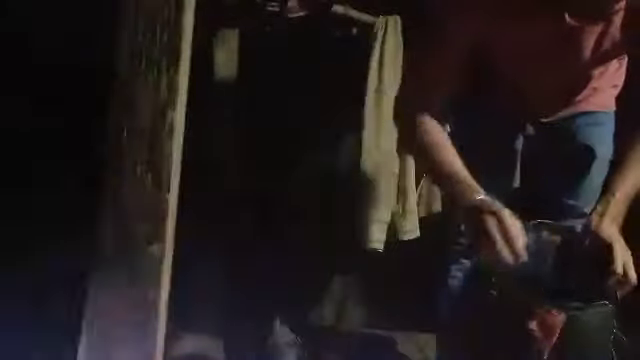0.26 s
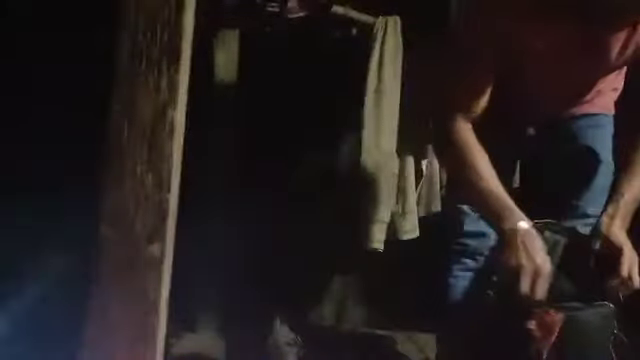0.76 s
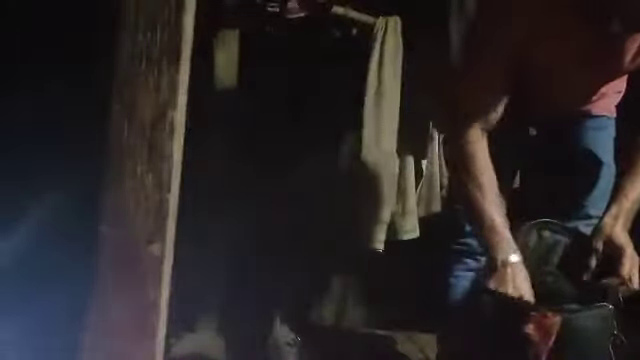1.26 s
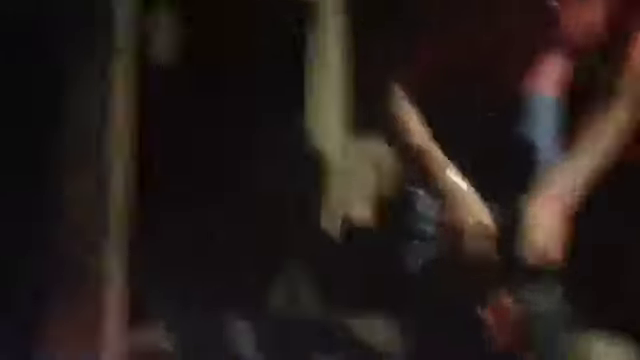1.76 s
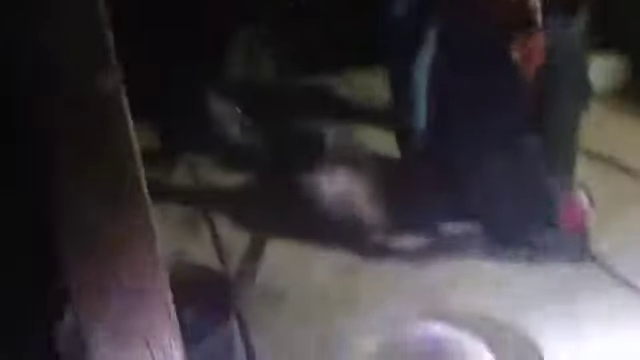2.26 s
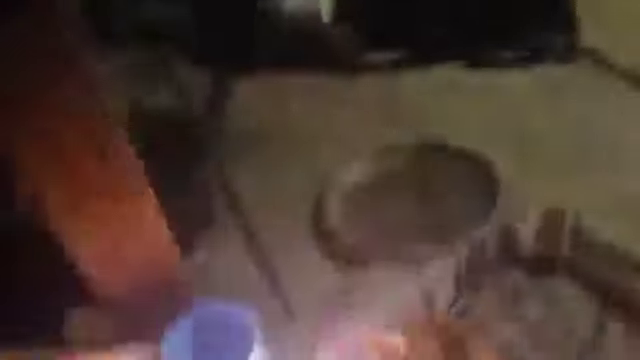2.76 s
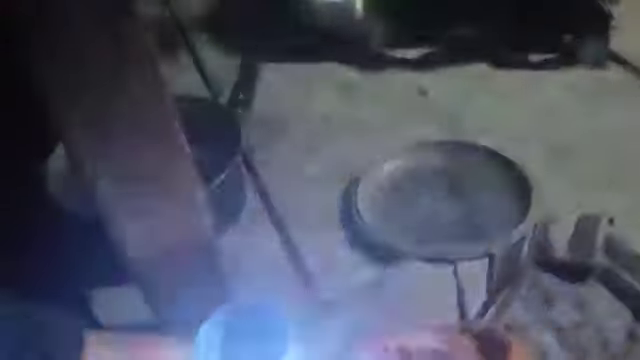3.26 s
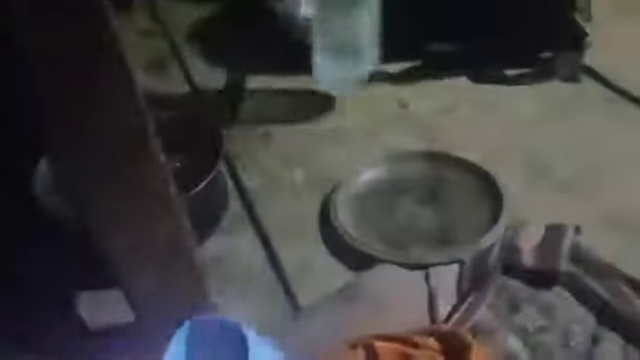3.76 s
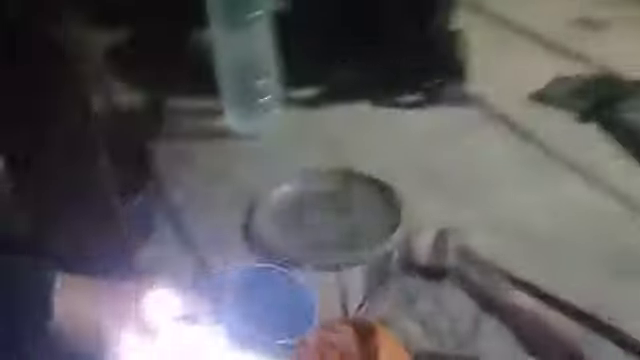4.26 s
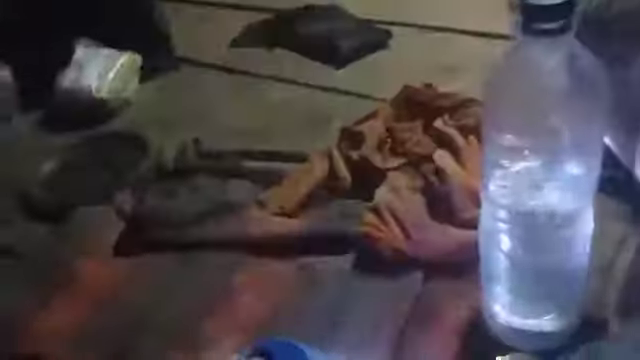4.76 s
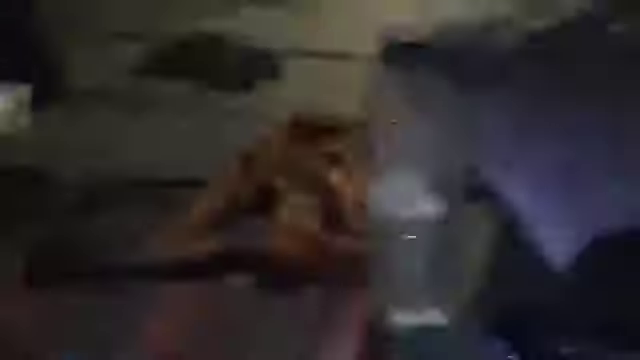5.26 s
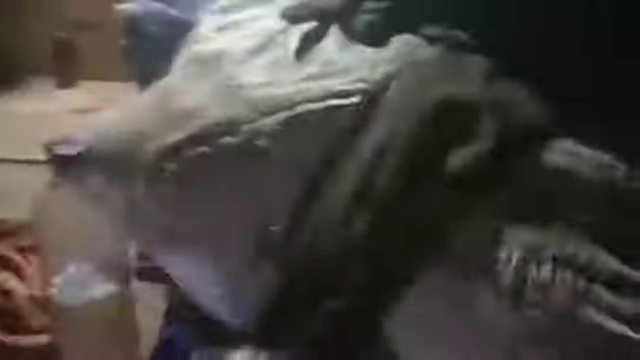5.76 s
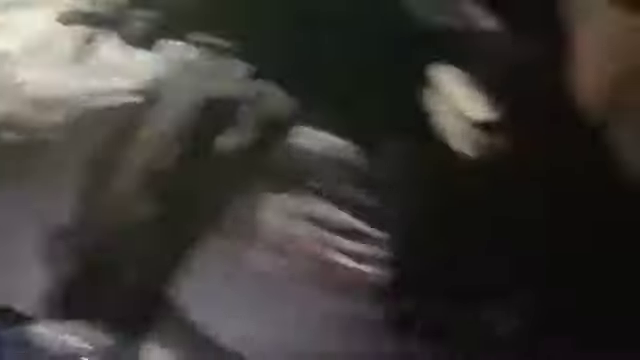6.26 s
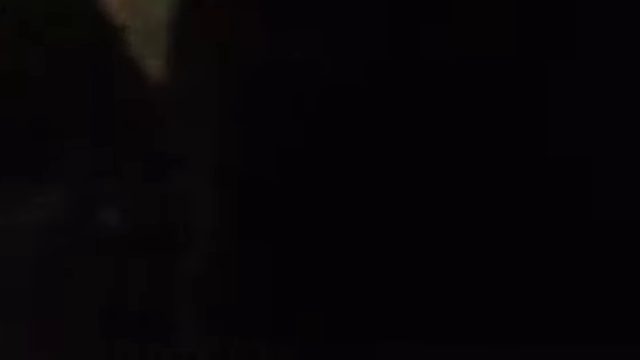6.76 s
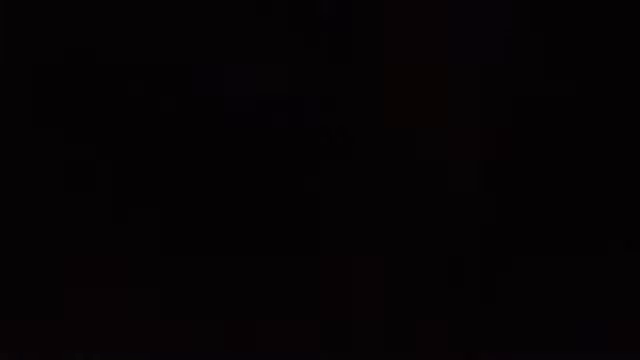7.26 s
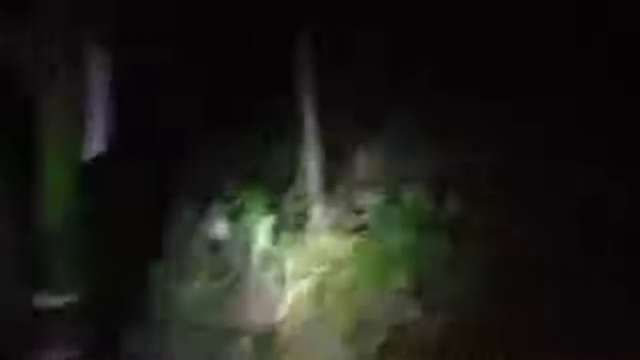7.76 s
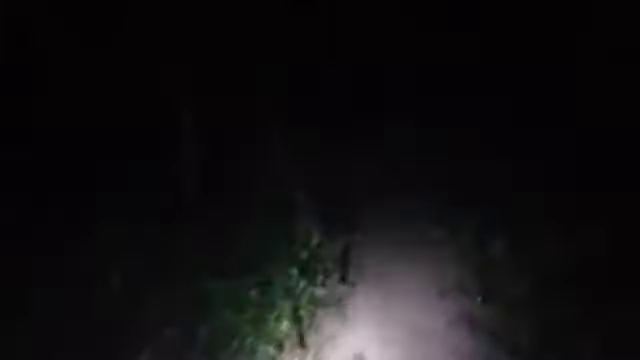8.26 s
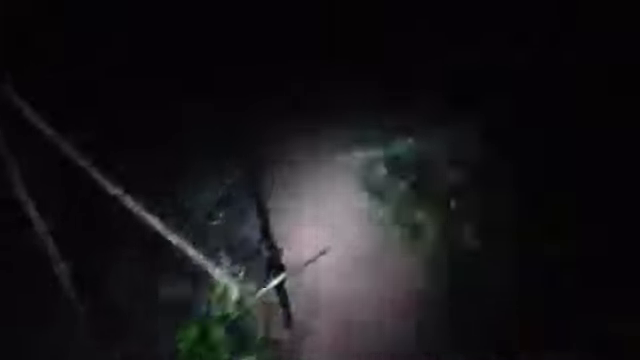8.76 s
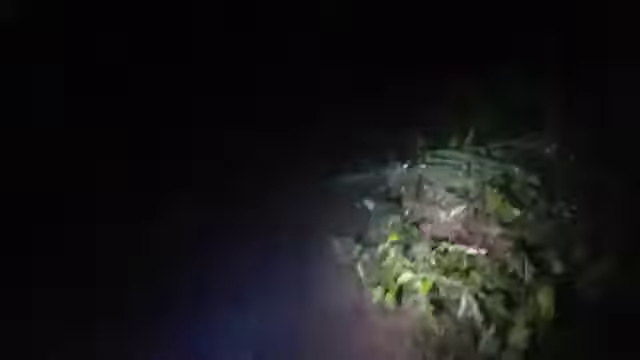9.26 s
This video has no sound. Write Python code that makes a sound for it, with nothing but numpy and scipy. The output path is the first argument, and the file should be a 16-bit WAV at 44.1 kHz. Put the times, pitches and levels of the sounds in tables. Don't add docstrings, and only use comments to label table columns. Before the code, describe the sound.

Close handling bumps and dry clicks over a dense night insect chorus, one metallic pan clank, then a fade to fainter, faster chirping with more knocks.

```python
import sys
import numpy as np
from scipy import signal
from scipy.fft import rfft, irfft, next_fast_len
from scipy.io import wavfile
from scipy.ndimage import uniform_filter1d

SR = 44100
rng = np.random.default_rng(int(sys.argv[2]) if len(sys.argv) > 2 else 0)


def wrap_up_sound(samples):
    columns = np.atleast_2d(samples).T
    tamed = np.clip(columns, -1, 1)
    steps = np.round(tamed * 32767).astype(np.int16)
    wavfile.write(sys.argv[1], SR, steps)


def voltage_ratio(decibels):
    exponent = np.asarray(decibels, float) / 20
    return 10 ** exponent


N = 418509
TIME = np.arange(N) / SR
FADE_S = (4.495, 4.824)
SECOND_SHOT_S = 4.72
FASTER = 1.195

# one singer's pitch in Hz, level in dB.
HUT_SINGERS = [(1965, -63), (2004, -65.5), (2027, -68.5), (2058, -67), (2132, -63.5), (2161, -59.5),
               (2176, -64), (2204, -64.5), (2260, -64.5), (2326, -64), (2342, -64), (2358, -65.5),
               (2374, -65.5), (2405, -65.5), (2459, -66.5), (2537, -69), (2572, -69)]
PATH_SINGERS = [(2346, -67), (2401, -65.5), (2459, -76), (2554, -62.5), (2581, -67), (2608, -64.5),
                (2641, -65.5), (2674, -77), (2704, -63.5), (2802, -65.5), (2881, -69), (2916, -71),
                (3004, -88), (3033, -68.5), (3160, -85), (2770, -74), (2785, -64.5), (2895, -66)]
# time in seconds, level in dB.
HUT_CHORUS = [(0.0, -52.5), (0.2, -50), (1.387, -50.5), (1.806, -49.5), (2.065, -48), (2.734, -45.5),
              (3.168, -47), (3.387, -48.5), (4.365, -47), (4.555, -50), (4.699, -43)]
PATH_CHORUS = [
    (4.85, -58.5),
    (5.37, -60),
    (5.99, -58),
    (7.64, -57.5),
    (8.48, -55.5),
    (9.49, -57),
]
NEARER = 1.1

# first chirp in seconds, last chirp in seconds, level in dB, strokes in the last chirp.
CHIRP_RUNS = [(.016, .016, -57.5, 3), (0.222, 1.81, -56, 3), (2.056, 2.056, -56, 1), (2.336, 2.336, -59, 3),
              (2.531, 2.531, -54, 3), (2.756, 3.441, -54.5, 3), (3.633, 3.86, -54.5, 3),
              (4.087, 4.54, -53.5, 3), (4.747, 5.321, -61, 3), (5.514, 5.514, -63.5, 3),
              (5.706, 5.706, -63, 3), (5.894, 6.278, -62, 3), (6.464, 6.847, -60.5, 2),
              (7.01, 7.2, -63.5, 3), (7.389, 7.77, -59.5, 3), (7.931, 8.31, -60.5, 3),
              (8.507, 8.507, -57.5, 2), (8.654, 9.032, -60, 3), (9.241, 9.241, -65, 2),
              (9.403, 9.403, -71, 3)]
CHIRP_EVERY_S, STROKE_EVERY_S = 0.2275, 0.0375
STROKE_SPREAD_DB = 1.2
# start in seconds, level in dB, pitch factor.
NEIGHBOURS = [(1.23, -64, .51), (1.248, -64, .51), (1.33, -64, .51), (2.83, -64, 1.1), (3.89, -79, 1.1),
              (5.5, -68, 0.88), (7.43, -66.5, 0.87), (6.425, -67, .88), (6.53, -69, .87), (5.53, -66, .91),
              (3.5, -69, .9), (3.51, -69, 1.1), (7.2, -72.5, 0.91), (0.2, -67, .87), (2.63, -70, .87),
              (1.7, -68, 1.11), (0.58, -72, 1.3), (8.62, -70, .87), (8.2, -68.5, 0.96), (8.455, -68, .88)]
STEADY_S = [5.627, 5.794, 5.988, 6.155, 6.34, 6.545, 6.727, 6.914, 7.105, 7.262, 7.435, 7.609, 7.793, 7.984,
            8.147, 8.336, 8.505, 8.693, 8.863, 9.055, 9.245, 9.411]

# loudest moment in seconds, length in seconds, cloth rustle in
# dB, shell scuff in dB.
RUBS = [(0.005, 0.18, -60, -57.5), (0.333, 0.34, -74, -59), (0.635, 0.13, -79, -57.5),
        (0.987, 0.18, -67, -51), (1.1, 0.04, -61, -48), (1.12, .05, -61, -50),
        (1.141, 0.073, -57.5, -48), (1.157, 0.092, -60.5, -49), (1.202, 0.076, -63.5, -58),
        (1.296, .05, -68, -59), (1.331, 0.1, -62, -54), (1.475, 0.058, -66, -53),
        (1.509, 0.09, -64.5, -48), (1.557, 0.096, -67.5, -48.5), (2.035, 0.097, -66.5, -62),
        (2.114, 0.23, -72, -60.5), (2.167, 0.15, -69, -65), (2.357, 0.14, -67, -53),
        (2.55, 0.2, -72.5, -56), (2.886, 0.068, -79, -69), (3.04, 0.5, -78, -56.5),
        (3.188, 0.038, -72, -58), (3.239, 0.081, -75, -53.5), (3.286, 0.17, -77, -62),
        (3.642, 0.021, -84, -48), (3.77, 0.051, -64, -55), (3.864, 0.19, -76.5, -69),
        (4.135, 0.17, -72, -57), (4.318, 0.17, -76, -56.5), (4.568, 0.54, -74.5, -61),
        (4.703, 0.038, -68, -64),
        (5.24, 0.32, -66.5, -62.5), (5.464, 0.081, -65, -65), (5.727, 0.34, -75.5, -81),
             (5.86, 0.2, -89, -68), (6.02, 0.32, -85, -60), (6.146, 0.049, -64, -54),
             (6.234, 0.077, -62, -53), (6.5, 0.3, -80, -69.5), (6.869, 0.37, -76, -59.5),
             (6.994, 0.029, -80, -53.5), (7.204, 0.47, -75, -68), (7.47, 0.095, -80, -62),
             (8.0, 0.73, -72, -64), (8.5, 0.12, -94, -62.5), (8.735, 0.23, -72, -74)]
RUB_DROP_DB = 34
RUB_RISE = 0.88
RUB_HOLD = 1.12
RESTING_DB = (-93.5, -71)
# time in seconds, rumble level in dB.
SQUEEZE = [(0.0, -80), (0.5, -67.5), (0.95, -74), (1.16, -69), (1.75, -59.5), (2.1, -76.5), (3.05, -67.5),
           (3.2, -67), (3.6, -81.5), (4.05, -81), (4.2, -60.5), (4.4, -70), (4.53, -59.5), (4.76, -64.5),
           (4.9, -72), (6.2, -76), (6.8, -71), (7.44, -88), (8.2, -73.5), (8.6, -86), (9.488, -81)]
# frequency in Hz, density in dB per Hz.
CLOTH = [(1400, -25.5), (2800, -7.5), (3530, -7.5), (4750, -9.5), (7230, -7.5), (8060, -14), (13800, -23),
         (15800, -34)]
SHELL = [(120, -39), (200, -4.5), (1100, 1.5), (1630, -7), (2190, -7), (2300, -3), (3400, -12.5),
         (4420, -46), (7480, -120)]
GRIP = [(18, -53), (30, -14), (68, -5.5), (113, -1.5), (184, 1), (220, -13), (300, -15.5), (390, -40),
        (660, -120)]

# start in seconds, peak in dB, pitch in Hz.
KNOCKS = [(0.06, -42, 1065), (0.603, -46, 1060), (0.924, -47.5, 710), (1.094, -45, 920),
          (1.293, -42, 1060), (1.508, -37.5, 750), (1.543, -39, 1050), (1.828, -40.5, 834),
          (1.993, -46, 1220), (2.307, -43, 1070), (2.356, -40.5, 1030), (2.495, -41, 1060),
          (3.1895, -38, 1130), (3.223, -37, 995), (3.338, -39.5, 577), (3.638, -37, 1016),
          (3.763, -48, 1140), (4.078, -42, 920), (4.338, -44, 870), (4.429, -34.5, 930),
          (4.604, -38, 865), (4.694, -38.5, 856),
          (5.714, -32, 1026), (5.725, -39.5, 1010), (5.967, -49, 940), (5.991, -47, 1000),
               (6.019, -50, 960), (6.044, -32, 1014), (6.114, -51, 990), (6.133, -43, 1030),
               (6.233, -46, 1040), (6.635, -39.5, 985), (6.847, -47, 650), (6.872, -35.5, 984),
               (6.891, -44, 1035), (6.977, -53, 1010), (7.074, -43.5, 930), (7.144, -48, 1420),
               (7.171, -44.5, 925), (7.191, -42, 1000), (7.2, -40, 1000), (7.194, -43.5, 3790),
               (7.216, -31, 906), (8.024, -48, 700), (8.913, -48, 680)]
# start in seconds, peak in dB,
# pitch in Hz.
TAPS = [(0.243, -47, 616), (0.346, -46, 1040), (0.61, -45, 1040), (0.976, -45, 524), (1.114, -40, 1050),
        (1.124, -41, 974), (1.178, -48, 568), (1.464, -49, 724), (1.599, -41, 1070), (1.64, -48, 1190),
        (1.791, -50, 400), (2.03, -45, 1200), (2.079, -48, 1180), (2.102, -48, 1250), (2.275, -51, 1060),
        (2.409, -45, 1310), (2.472, -43, 1070), (2.543, -45, 684), (2.846, -51, 1400), (3.024, -51, 990),
        (3.113, -52, 1060), (4.148, -45, 950), (4.292, -38, 830), (4.501, -48, 890), (4.814, -44, 1030),
        (5.327, -54, 953), (5.579, -56, 1030), (5.758, -48, 988), (5.778, -47, 1110), (5.813, -50, 540),
        (5.893, -51, 969), (5.918, -50, 1160), (5.982, -45, 929), (6.005, -45, 990), (6.165, -44, 977),
        (6.22, -51, 950), (6.307, -48, 993), (6.397, -51, 990), (6.431, -48, 964), (6.753, -55, 1040),
        (6.773, -45, 1070), (6.81, -48, 974), (6.994, -51, 795), (7.02, -55, 1340), (7.067, -52, 980),
        (7.334, -56, 1160), (7.36, -53, 1080), (7.371, -47, 945), (7.451, -61, 958), (7.803, -50, 1460),
        (7.831, -53, 665), (7.897, -56, 1170), (8.104, -61, 807), (8.241, -47, 972), (8.404, -55, 581),
        (8.496, -54, 1070), (9.061, -49.5, 837), (9.285, -54, 1230)]
TAP_DB = -4
RING_GROWTH = 0.21
# start in seconds, peak in dB, pitch in Hz.
SNAPS = [
    (3.1883, -15, 1900),
    (3.6369, -21, 1700),
    (3.6399, -24, 1300),
    (6.9782, -30, 3500),
    (6.0448, -30, 1800),
    (6.8735, -32, 1700),
    (1.5455, -31, 2600),
    (1.1465, -30, 2800),
]
# start in seconds, length in seconds, level in dB, first pitch in Hz, last pitch in Hz.
CREAKS = [
    (4.257, .035, -50, 930, 870),
    (4.315, .04, -50, 810, 890),
    (1.5, .025, -49, 820, 700),
    (3.228, .02, -50, 950, 1000),
    (7.192, .014, -37, 980, 1010),
]
# start in seconds, peak in dB, pitch in Hz, decay time t60 in seconds.
BUMPS = [(1.095, -39, 420, 0.049), (1.483, -54, 379, 0.17), (1.738, -50, 135, 0.24),
         (3.333, -40, 410, 0.041), (4.077, -37, 116.5, 0.13), (4.094, -41, 345, 0.14),
         (4.077, -43, 328, .06), (4.13, -50, 350, .3), (4.17, -50, 190, .15), (4.288, -41, 620, .04),
         (4.315, -45, 300, .1), (4.375, -52, 250, .1), (1.828, -49.5, 390, 0.062),
         (1.615, -48.5, 120, 0.13), (6.872, -46, 453, .04), (7.074, -46.5, 500, 0.037),
         (7.215, -47, 560, .04), (4.29, -39, 360, 0.05), (4.3, -41.5, 168.7, 0.11),
         (4.816, -51.5, 252, 0.12), (5.128, -48.5, 417, 0.063), (5.432, -52, 405, 0.079),
         (6.132, -51.5, 328, 0.17), (6.359, -62, 149, 0.23), (6.849, -52, 394, 0.05),
         (7.19, -49, 513, 0.074), (8.509, -52.5, 439, 0.066), (8.903, -58.5, 501, 0.25)]
# start in seconds, bright level in dB, middle
# level in dB.
CLICKS = [(0.9222, -30.5, -73), (1.0885, -54, -58), (1.096, -56, -50), (1.103, -50, -47),
          (1.117, -54, -46), (1.126, -52, -46), (1.178, -54, -55), (1.1467, -38, -44),
          (1.4646, -35, -58), (1.5445, -43.5, -52), (2.0308, -34, -62), (2.0795, -39, -48),
          (2.147, -54, -48), (2.1911, -29.5, -45), (2.3064, -30.5, -68), (2.3588, -33.5, -67),
          (2.428, -42, -51.5), (2.463, -41, -54), (2.497, -30.5, -45), (2.555, -27.5, -85),
          (2.744, -53, -56), (2.864, -44, -47.5), (3.025, -34, -51), (3.1886, -27, -38),
          (3.224, -56, -46.5), (3.338, -58, -49.5), (3.637, -36, -40), (3.7528, -60, -46.5),
          (4.291, -27, -71), (4.4285, -76, -43.5),
          (4.77, -56, -56), (5.714, -48, -50.5), (5.778, -35, -54.5), (6.0451, -46, -49),
               (6.133, -31.5, -51), (6.1666, -56, -51.5), (6.237, -41, -59), (6.254, -50, -54),
               (6.813, -38, -76), (6.846, -57, -54), (6.8743, -38, -51), (6.9784, -39, -54),
               (7.0214, -56, -61), (7.155, -62, -58), (7.1912, -32.5, -53), (7.213, -55, -68),
               (6.675, -58, -59), (7.334, -48, -62), (7.505, -58, -57), (7.718, -61, -61),
               (7.985, -42, -58), (8.031, -38, -57), (8.101, -47, -65), (8.2402, -55, -65),
               (8.678, -64, -59), (8.911, -62, -54.5)]
PAN_S = 3.188
PAN_HZ = [931, 10150, 12700, 14400, 1480, 3035, 3390, 6966, 7192, 7429, 7833]
# level in dB, decay time t60 in seconds.
PAN_MODES = [(-44, .16), (-56, .08), (-55, .05), (-54, .06), (-35, 0.03), (-40, 0.26), (-50, .2), (-56, .3),
             (-50, 0.32), (-59, .25), (-54, .15)]

# frequency in Hz, density in dB per Hz.
HUT_AIR = [(18, -53), (30, -10), (73, -13), (145, -7), (183, -14.5), (326, -31), (1660, -15.5), (2210, -3),
           (2950, -17), (3940, -22.5), (5250, -10.5), (7580, -33), (9860, -33.5), (12200, -44),
           (15800, -69)]
PATH_AIR = [(18, -58), (30, -39), (48, -56), (130, -10.5), (264, -18.5), (907, -14), (1990, -14.5),
            (2660, -2), (3280, -12), (4260, -18.5), (4980, -18.5), (6150, -11.5), (9600, -27.5),
            (11800, -29.5), (15800, -64)]
HUT_AIR_DB, PATH_AIR_DB = -55, -60
# frequency in Hz, gain in dB.
PORT = [(100, 1), (9500, -2.5), (11500, -9.5), (13800, -14), (15100, 7.5), (16000, -17)]


def chorus(singers, level, span, waver_hz, steady):
    slow_t = np.arange(0, N / SR + .01, .005)
    t, out = TIME[span], np.zeros(N)
    memory = np.exp(-np.pi * waver_hz * .005)
    for hz, db in singers:
        a, b = signal.lfilter([1], [1, -memory], rng.standard_normal((2, len(slow_t))))
        direct = steady * voltage_ratio(NEARER * (db - singers[0][1]))
        waver = np.interp(t, slow_t, direct + evened(a + 1j * b))
        tone = np.exp(2j * np.pi * (hz * t + rng.random()))
        out[span] += voltage_ratio(db) * (waver * tone).real
    out[span] = evened(out[span])
    return along(level) * out


def crickets():
    rows = []
    for first, last, db, strokes in CHIRP_RUNS:
        speed = FASTER if first > SECOND_SHOT_S else 1
        beat = np.arange(first, last + .08, CHIRP_EVERY_S / speed)
        rows += [(s, 1, db, 3, 690) for s in beat[:-1]]
        rows.append((beat[-1], 1, db, round(strokes), 690))
    rows += [(s, pitch, db, 3, 430) for s, db, pitch in NEIGHBOURS]
    rows += [(s, 1.11, -74, 3, 400) for s in STEADY_S]
    out = np.zeros(N)
    for s, pitch, db, strokes, fall_hz in rows:
        speed = FASTER if s > SECOND_SHOT_S else 1
        start = s + .002 * (speed > 1)
        for k, chance in enumerate(rng.standard_normal(3)[:strokes]):
            sound = stroke(db + STROKE_SPREAD_DB * chance, pitch, speed, fall_hz)
            add(out, start + k * STROKE_EVERY_S / speed, sound)
    add(out, 4.767, stroke(-65, 0.98, 0.99, 740))
    wall = voltage_ratio(-3) * scatter(out, t60=.05, delay_s=.007)
    forest = voltage_ratio(-7) * scatter(out, t60=.2, delay_s=.004)
    return out + wall + forest


def stroke(db, pitch, speed, fall_hz):
    u = np.linspace(0, 1, round(.024 / speed * SR))
    slips = .015 * evened(uniform_filter1d(rng.standard_normal(len(u)), size=40))
    fall = np.sin(np.pi / 2 * np.minimum(u / .85, 1)) ** 1.5
    hz = pitch * speed * (rng.uniform(.994, 1.006) + slips) * (5480 - fall_hz * fall)
    uneven_db = 2.5 * evened(uniform_filter1d(rng.standard_normal(len(u)), size=120))
    shape = np.minimum(u / .1, 1) * np.minimum((1 - u) / .3, 1)
    return voltage_ratio(db + 5.5 + uneven_db) * shape * np.sin(2 * np.pi * np.cumsum(hz) / SR)


def hand():
    cloth, shell = rubbing()
    crackle = 0.83 + 0.26 * grains(per_s=700, spread_db=3.0, t60=.012)
    rustle = voltage_ratio(10.0) * hiss(CLOTH, 2.8, 2.9) * crackle
    roughness = .9 + .3 * grains(per_s=200, spread_db=2, t60=.025)
    scuff = voltage_ratio(-2.5) * hiss(SHELL, 3.5, 2.5) * roughness
    lumps = 0.63 + 0.76 * grains(per_s=11, spread_db=3.0, t60=0.63)
    grip = evened(colour(rng.standard_normal(N), GRIP)) * lumps
    return cloth * rustle + shell * scuff + along(SQUEEZE) * grip


def rubbing():
    t = TIME[::64]
    gain = voltage_ratio(np.array(RESTING_DB))[:, None] * np.ones(len(t))
    for s, length, *dbs in RUBS:
        away = np.maximum(t - s, (s - t) / RUB_RISE) / max(length, .02)
        fall_db = RUB_DROP_DB * np.minimum(away, 9) ** RUB_HOLD
        gain = gain + voltage_ratio(np.array(dbs)[:, None] - fall_db)
    return [np.interp(TIME, t, g) for g in gain]


def grains(per_s, spread_db, t60):
    snaps = (rng.random(N) < per_s / SR) * voltage_ratio(spread_db * np.minimum(rng.exponential(1, N), 4))
    return evened(signal.lfilter([1], [1, -voltage_ratio(-60 / t60 / SR)], snaps))


def impacts():
    out = knocks() + creaks() + bumps() + clicks()
    out += voltage_ratio(-14) * scatter(out, t60=.09, delay_s=.006)
    return out + pan()


def knocks():
    out = np.zeros(N)
    taps = [(s, db + TAP_DB, hz) for s, db, hz in TAPS]
    for s, db, hz in KNOCKS + taps:
        ring_db = db + 4.5 + RING_GROWTH * (db + 33)
        add(out, s + 0.00099, ring(ring_db, hz, 0.028, rise=0.00066))
        add(out, s, burst(db - 8.5, 0.48 * hz, 1.51 * hz, .025))
        add(out, s, burst(db - 16, 1.3 * hz, 2.6 * hz, .01))
    for s, db, hz in SNAPS:
        add(out, s, -ring(db, hz, .005))
    return out


def creaks():
    out = np.zeros(N)
    for s, length, db, from_hz, to_hz in CREAKS:
        u = np.linspace(0, 1, round(length * SR))
        slip = voltage_ratio(db + 4.0 * evened(uniform_filter1d(rng.standard_normal(len(u)), size=200)))
        hz = from_hz + (to_hz - from_hz) * u
        add(out, s, slip * np.sin(np.pi * u) ** .5 * np.sin(2 * np.pi * np.cumsum(hz) / SR))
    return out


def bumps():
    out = np.zeros(N)
    for s, db, hz, t60 in BUMPS:
        add(out, s, ring(db + 0.49, hz, t60, rise=0.0017))
        add(out, s, ring(db - 10.0, 2.9 * hz, .5 * t60, rise=0.0021))
        add(out, s, burst(db - 5.0, 0.47 * hz, 1.4 * hz, t60))
    return out


def clicks():
    bright, middle = np.zeros(N), np.zeros(N)
    t = np.arange(2500) / SR
    decay = voltage_ratio(-60 * t / .0025) + .55 * voltage_ratio(-60 * t / .016) + .2 * voltage_ratio(-60 * t / .09)
    for s, db, middle_db in CLICKS:
        crack = rng.choice([-1., 1.], len(t)) * decay
        add(bright, s, voltage_ratio(db - 3.0) * crack)
        add(middle, s, voltage_ratio(middle_db + 13.5) * crack)
    treble = band(bright, 4500, 7730) + voltage_ratio(-23.0) * band(bright, 7200, 14000)
    return treble + band(middle, 930, 4780)


def pan():
    out = np.zeros(N)
    for hz, (db, t60) in zip(PAN_HZ, PAN_MODES):
        add(out, PAN_S, ring(db, hz, t60))
    return out


def distant(db, speed):
    return voltage_ratio(db) * evened(band(rng.standard_normal(N), 4450 * speed, 7100 * speed, order=5))


def hiss(spectrum, patchy_db, flicker_db):
    frames = N // 128 + 5
    a, b, patches = rng.standard_normal((frames, 257, 3), dtype=np.float32).T
    patches = evened(uniform_filter1d(uniform_filter1d(patches, 6, axis=0), 20, axis=1))
    flicker = evened(uniform_filter1d(rng.standard_normal(frames), size=3))
    field = (a + 1j * b) * voltage_ratio(patchy_db * patches + flicker_db * flicker)
    noise = signal.istft(field, nperseg=512, noverlap=384)[1][:N]
    return evened(colour(noise, spectrum))


def scatter(x, t60, delay_s):
    taps = np.zeros(SR // 2)
    at = np.arange(round(delay_s * SR), SR // 2 - 20, 20)
    at = at + rng.integers(0, 20, len(at))
    taps[at] = rng.choice([-1., 1.], len(at)) * voltage_ratio(-60 * at / SR / t60)
    return signal.fftconvolve(x, taps / np.linalg.norm(taps))[:N]


def ring(db, hz, t60, rise=0.00011):
    t60 = np.clip(t60, .004, .6)
    t = np.arange(round(t60 * SR)) / SR
    return voltage_ratio(db - 60 * t / t60) * (1 - np.exp(-t / rise)) * np.sin(2 * np.pi * hz * t)


def burst(db, lo_hz, hi_hz, t60):
    t = np.arange(2500) / SR
    return evened(band(rng.standard_normal(len(t)), lo_hz, hi_hz)) * voltage_ratio(db - 60 * t / t60)


def band(x, lo_hz, hi_hz, order=2):
    return signal.sosfilt(signal.butter(order, [lo_hz, hi_hz], "band", fs=SR, output="sos"), x)


def colour(x, spectrum):
    size = next_fast_len(N, True)
    f, db = np.transpose(spectrum)
    gain = voltage_ratio(np.interp(np.log(np.fft.rfftfreq(size, 1 / SR) + 1), np.log(f + 1), db))
    return irfft(rfft(x, size) * gain, size)[..., :N]


def evened(x):
    return x / np.sqrt(np.mean(abs(x) ** 2) + 1e-20)


def along(rows):
    return voltage_ratio(np.interp(TIME, [r[0] for r in rows], [r[1] for r in rows]))


def add(mix, s, sound):
    part = mix[round(s * SR):][:len(sound)]
    part += sound[:len(part)]


def scene():
    second = np.interp(TIME, FADE_S, [0, 1])
    hut = voltage_ratio(HUT_AIR_DB) * hiss(HUT_AIR, 3.0, 1.0) + distant(-64.0, 0.962)
    hut += chorus(HUT_SINGERS, HUT_CHORUS, second < 1, waver_hz=8.0, steady=1.33)
    path = voltage_ratio(PATH_AIR_DB) * hiss(PATH_AIR, 1.86, 1.0) + distant(-72.0, FASTER)
    path += chorus(PATH_SINGERS, PATH_CHORUS, second > 0, waver_hz=10.4, steady=0.53)
    night = (1 - second) * hut + second * path
    return (night + crickets() + hand() + impacts())[None]


def low_pass(x):
    return signal.sosfilt(signal.butter(12, 16370, fs=SR, output="sos"), x)


def record(dry):
    second = np.interp(TIME, FADE_S, [0, 1])
    ported = (1 - second) * colour(dry, PORT) + second * dry
    low_cut = signal.butter(3, 70, "high", fs=SR, output="sos")
    top_cut = signal.firwin(401, 15600, window=("kaiser", 8), fs=SR)[None]
    heard = signal.oaconvolve(signal.sosfilt(low_cut, ported), top_cut, "same")
    return low_pass(heard)


dry = scene()
out = record(dry)
wrap_up_sound(out)
```